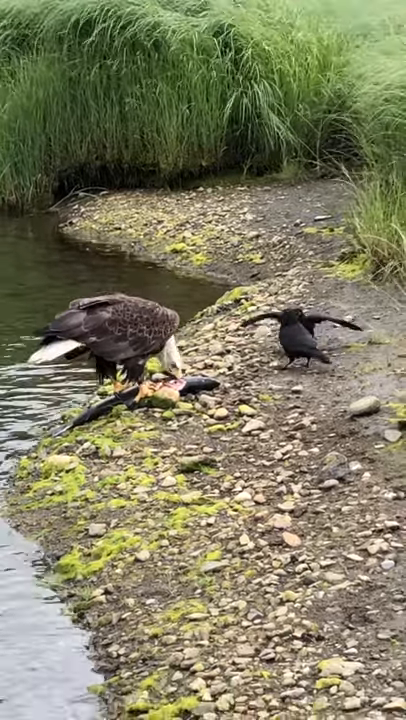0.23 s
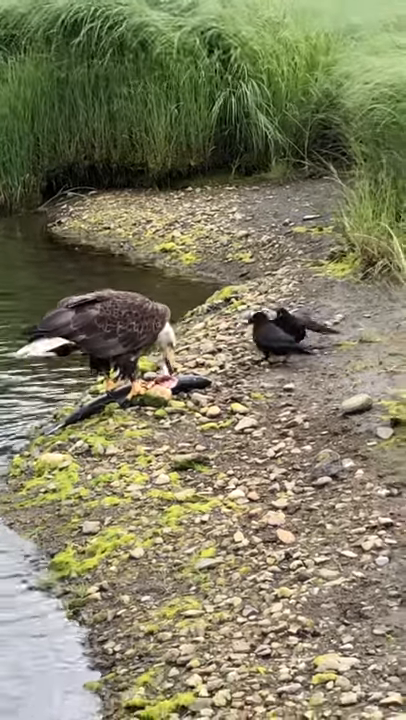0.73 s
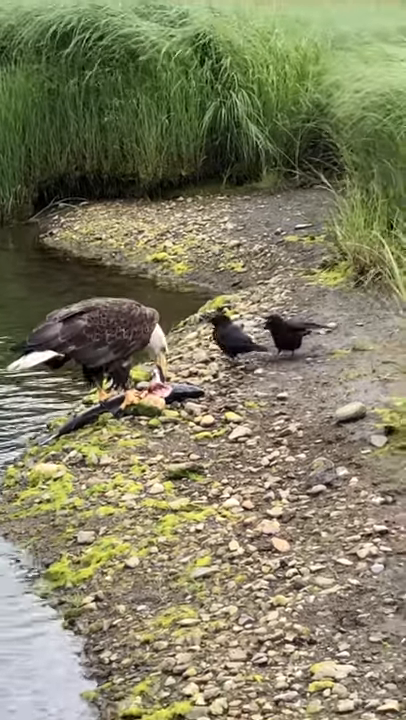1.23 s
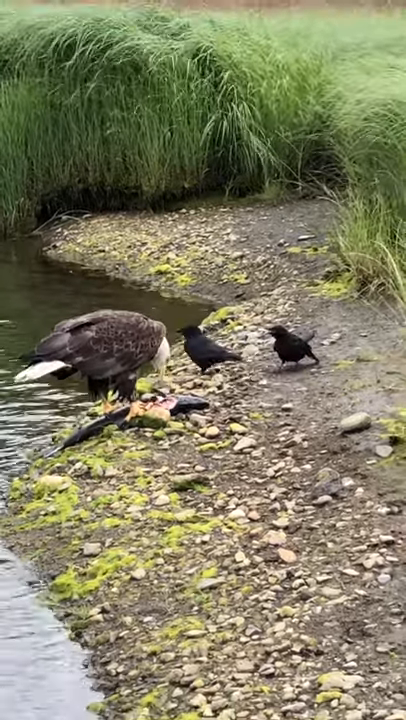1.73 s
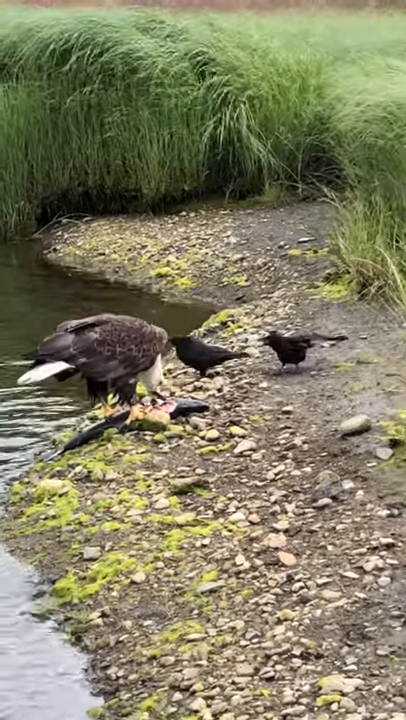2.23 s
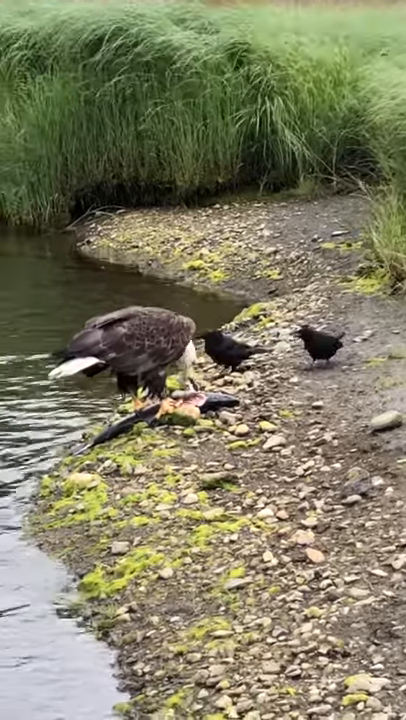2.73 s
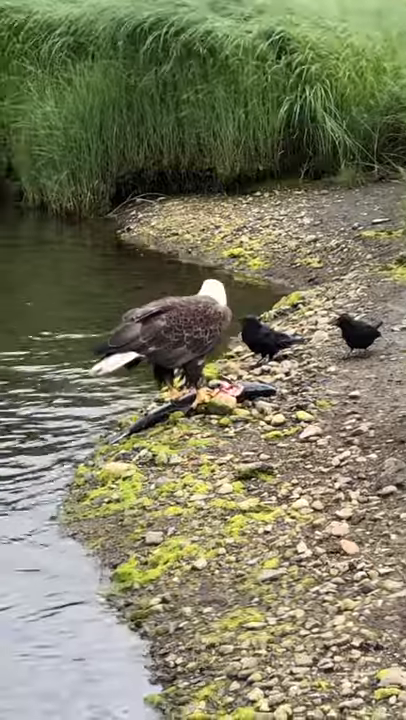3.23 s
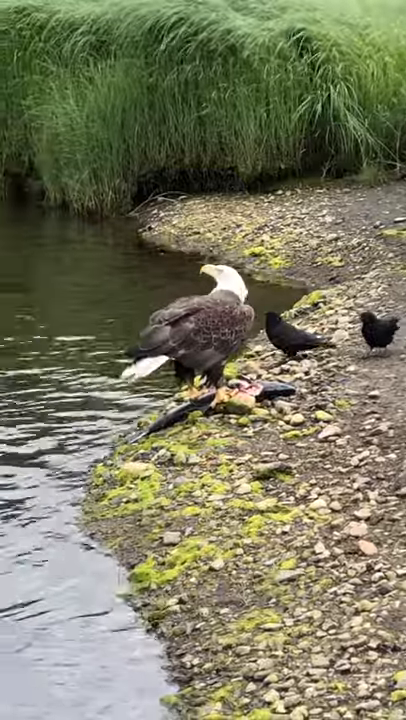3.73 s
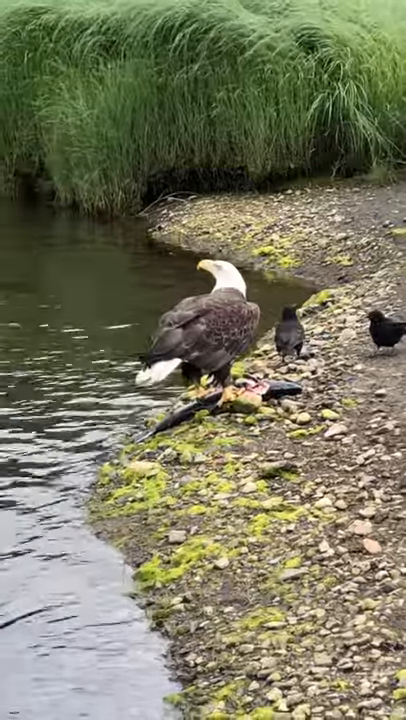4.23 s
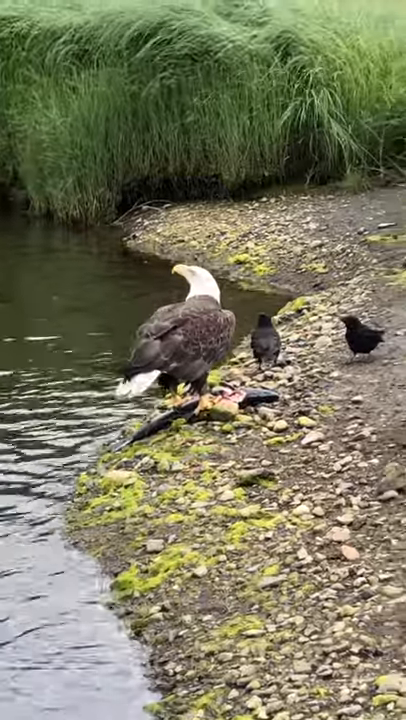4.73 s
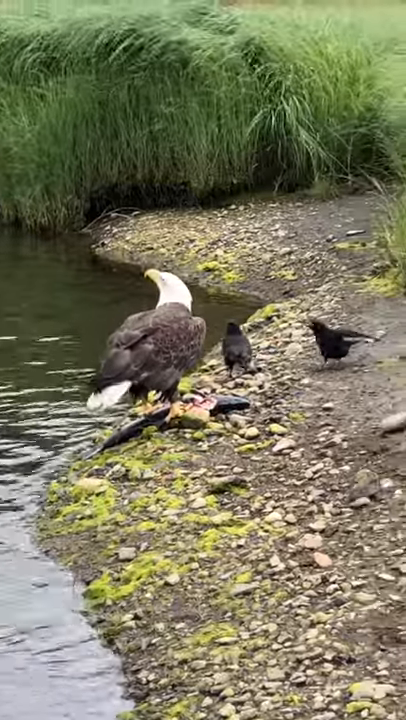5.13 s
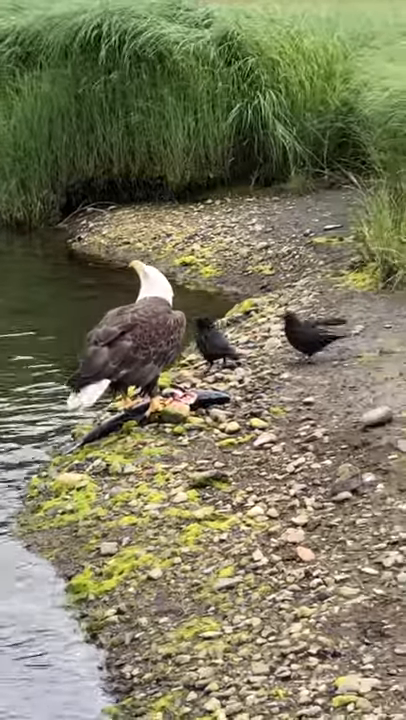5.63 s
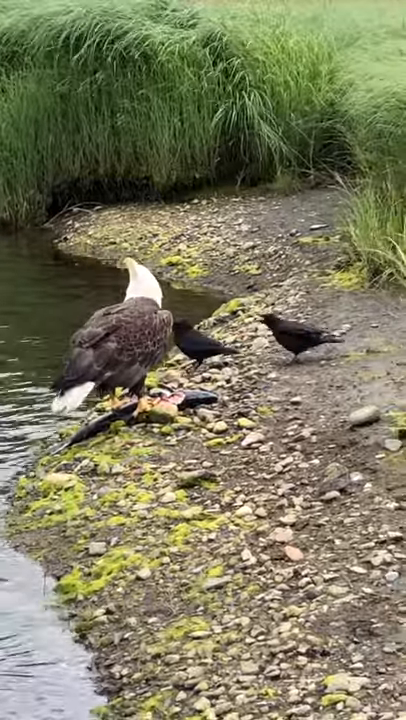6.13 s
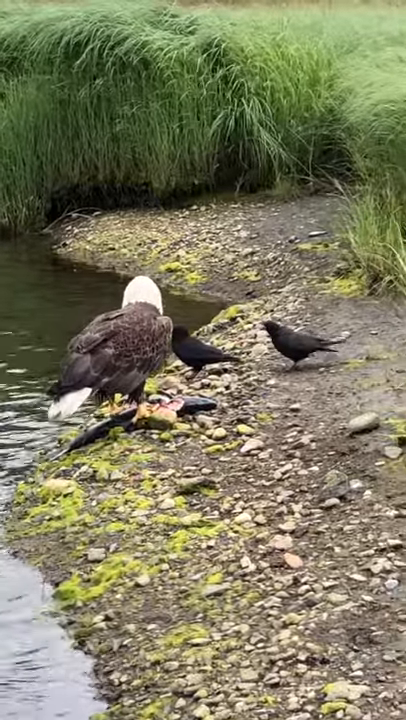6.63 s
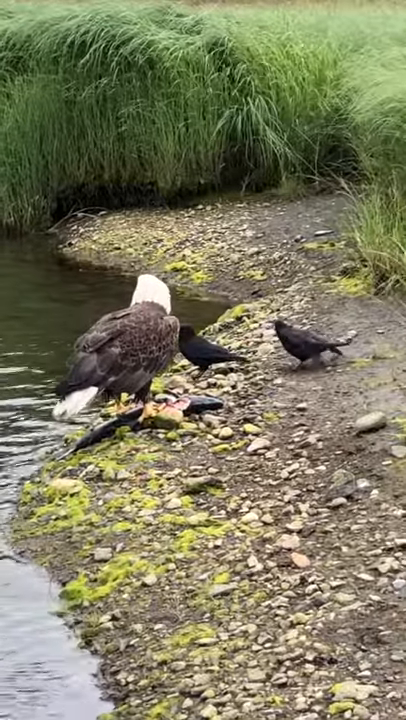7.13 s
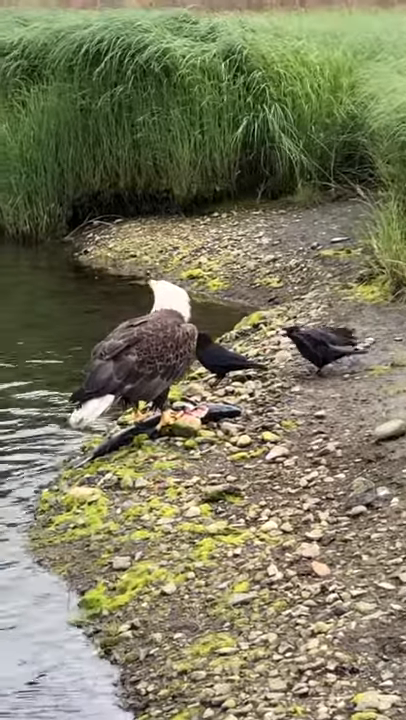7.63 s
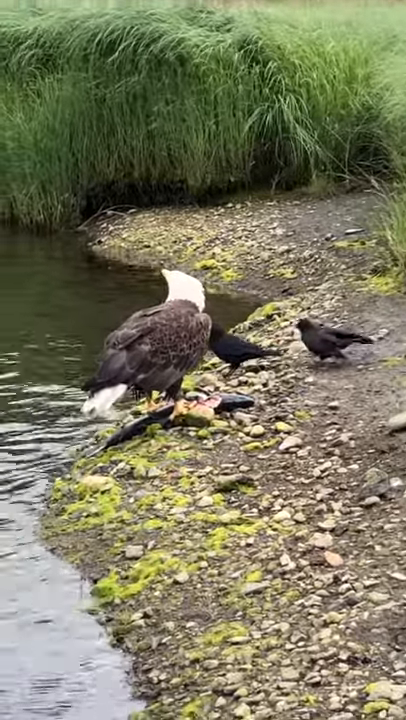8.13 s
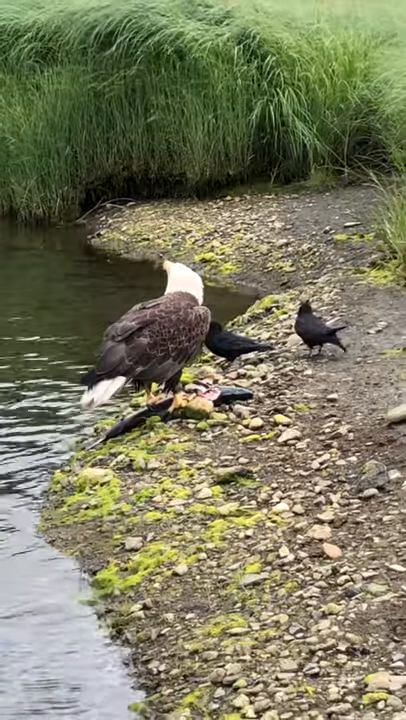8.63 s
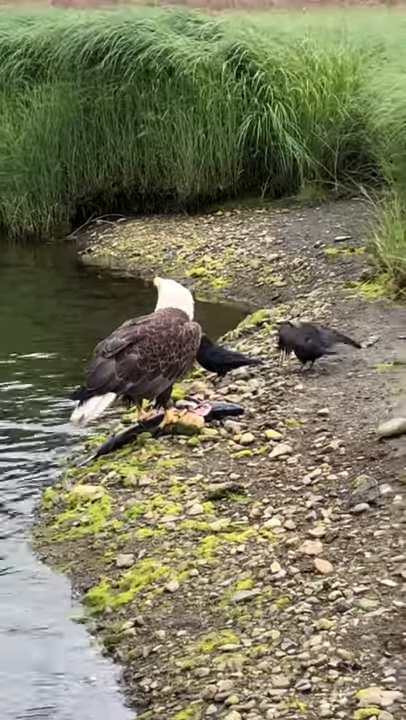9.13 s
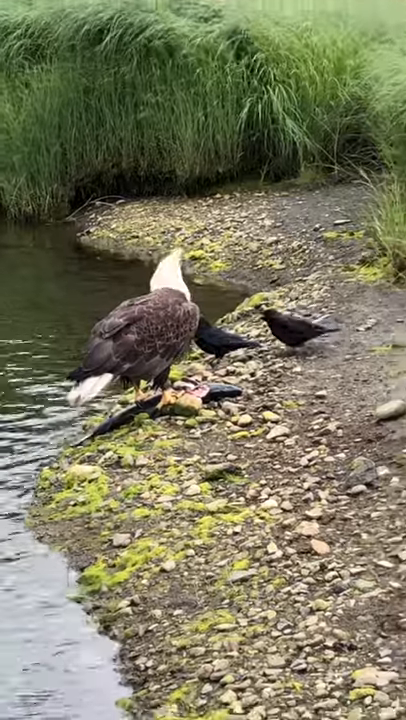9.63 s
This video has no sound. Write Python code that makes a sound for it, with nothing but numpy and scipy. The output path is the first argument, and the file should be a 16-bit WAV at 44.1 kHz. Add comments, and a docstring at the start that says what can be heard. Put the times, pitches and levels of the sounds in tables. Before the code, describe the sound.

Outdoors on a gravel creek bank, a crow's hoarse caw is already fading as it opens, then more short rasping caws follow about every second. Thin, near-pure peeps from another bird dot the gaps. Behind lies a soft low rush and a faint far engine tone creeping upward. Wind knocks the microphone in single thumps, swelling to a loud low rumble in the last second or so.

```python
"""The hoarse tail of a caw comes first: crows beg on a gravel creek bank, beside an eagle at its fish.
Pulses through a throat filter make their long caws, with feathery rustles of noise late on.
Another bird peeps thinly in near-pure tones; a far engine tone slowly rises over a soft noise rush.
Wind buffets the microphone as bands of noise, in single thumps at first and a loud rumble at the end."""
import sys
import numpy as np
from scipy import signal
from scipy.fft import rfft, irfft, next_fast_len
from scipy.io import wavfile
from scipy.ndimage import uniform_filter1d, map_coordinates

SR = 44100
rng = np.random.default_rng(int(sys.argv[2]) if len(sys.argv) > 2 else 0)


def store_pcm(level_fs):
    """Save levels as 16-bit WAV."""
    pcm = np.round(np.clip(level_fs, -1, 1) * 32767).astype(np.int16)
    wavfile.write(sys.argv[1], SR, np.atleast_2d(pcm).T)


N = 435708
TIME = np.arange(N) / SR
CUTOFF_HZ = 15900  # top of the microphone's range

# Distant rush, loudness over time: (time [s], level [dB])
RUSH_LEVEL = [(0, -39), (2.6, -38.5), (3.6, -36.5), (5, -37.5), (6, -35), (6.8, -35.5), (7.3, -37.5),
              (8.2, -37.5), (9.88, -39.5)]
# Distant rush, tone colour: (frequency [Hz], relative power density [dB])
RUSH_COLOUR = [(30, -26), (70, 12.5), (170, 2), (380, -12.5), (520, -9), (700, -2), (900, -0.5), (1150, -8),
               (1500, -14.5), (2200, -23.5), (3500, -31.5), (5500, -38.5), (9000, -48), (15000, -51)]
# Far engine: (time [s], pitch [Hz], level [dB])
ENGINE_COURSE = [(0, 128, -52), (1.9, 129.5, -48), (3.2, 134.5, -39), (6.95, 142.3, -38), (7.5, 144.3, -42),
                 (9.88, 149, -36)]

# Wind gusts that swell and die away: (time [s], half width [s], level [dB])
WIND_GUSTS = [(.03, 0.39, -48.5), (.56, 0.17, -40), (1.35, 0.28, -45), (1.73, 0.068, -39), (2.64, .06, -37),
              (3.32, 0.077, -43), (4.3, 0.59, -49.5), (5.1, 0.13, -37), (5.39, 0.035, -32.5),
              (5.84, 0.22, -34.5), (6.55, 0.12, -32), (7.8, 0.55, -46.5), (8.5, .12, -31),
              (8.79, 0.15, -23.5), (9.05, 0.29, -33.5), (9.37, 0.09, -22), (9.57, 0.14, -22.5),
              (9.88, 0.049, -24.5)]
# Single wind thumps: (time [s], half width [s], level [dB])
WIND_BUFFETS = [(.73, 0.037, -31.5), (1.243, 0.016, -25.5), (1.713, 0.022, -27), (2.63, 0.024, -37),
                (4.708, 0.017, -21.5), (5.689, 0.0095, -20.5), (5.774, 0.0095, -27), (6.004, 0.0069, -23.5),
                (6.57, 0.024, -28.5), (8.425, 0.028, -24), (8.795, 0.023, -22), (8.85, 0.0095, -15.5),
                (9.35, .014, -23), (9.58, 0.016, -19.5), (9.619, 0.011, -14.5), (9.665, 0.0066, -19),
                (9.842, 0.0066, -19)]
# Eddies by size: (centre [Hz], level against the reference wind [dB], growth [dB per dB of wind])
WIND_EDDIES = [(62.6, -1, 0.58), (113, 4.5, 0.96), (194.3, 0.5, 1.26), (355, -6.5, 1.553),
               (644, -20.5, 1.65), (1120, -42, 1.91), (2100, -54, 0.3)]
BREEZE_DB = -66  # the air between gusts

# Soft feathery rustles: (time [s], length [s], level [dB])
FEATHER_RUSTLES = [(8.18, 0.24, -51), (8.675, 0.22, -52)]

# Thin whistled notes: (time [s], length [s], pitch [Hz], fundamental level [dB], octave level [dB])
PEEP_NOTES = [(0.882, 0.024, 2690, -60, -62), (1.845, 0.032, 2600, -52.5, -65),
              (1.903, 0.033, 2665, -45.5, -55.5), (2.626, 0.071, 2640, -57, -53.5),
              (2.706, 0.028, 2375, -64, -52.5), (2.836, 0.051, 2620, -51.5, -57),
              (2.937, 0.025, 2660, -56, -50.5), (3.056, 0.042, 2640, -56, -50),
              (3.118, 0.032, 2620, -51, -61), (3.187, 0.035, 2615, -49, -52),
              (3.325, 0.027, 2550, -46, -52), (3.739, 0.015, 2720, -47.5, -60),
              (4.042, 0.043, 2660, -52, -50), (4.125, 0.014, 2740, -69, -50),
              (4.254, 0.021, 2640, -56.5, -58), (4.368, .027, 2630, -53, -54),
              (4.484, 0.031, 2580, -54, -58.5), (4.6, .029, 2550, -50.5, -58), (4.713, .02, 2470, -51, -62),
              (4.825, .025, 3430, -52, -75), (5.919, .03, 2860, -51, -43.5), (6.005, 0.032, 2740, -62, -58),
              (6.435, 0.039, 2570, -50.5, -61), (6.592, 0.063, 2580, -49, -73),
              (6.639, 0.1, 2660, -51.5, -55), (7.231, 0.036, 2455, -44, -57), (7.283, 0.01, 2920, -42, -47),
              (7.305, 0.0074, 2810, -41, -44), (7.354, 0.028, 2415, -46.5, -59),
              (7.383, 0.034, 2760, -43, -43.5), (7.479, 0.039, 2700, -45, -43.5),
              (8.165, 0.035, 2750, -44, -61), (8.539, 0.046, 2750, -47, -58), (8.639, .039, 2680, -45, -56),
              (8.745, 0.033, 2550, -48, -58), (9.511, 0.018, 2810, -45.5, -66),
              (9.621, 0.056, 2710, -48, -59)]
# Notes above this pitch rise, notes below it fall, by this share of the distance
PEEP_LEVEL_HZ, PEEP_GLIDE = 2583, .7
# Further peeps at random times; length is the average, spread a share of the pitch
RANDOM_PEEP_COUNT, RANDOM_PEEP_S, RANDOM_PEEP_HZ, RANDOM_PEEP_SPREAD = 12, 0.03, 2750, 0.039
RANDOM_PEEP_DB, RANDOM_PEEP_OCTAVE_DB = -51.5, -67.5

# Caws, each one gesture: (start [s], length [s], break after [s], rasp before the break [s],
#  rasp roughness [0-1], roughness after the break [0-1], opening pitch [Hz], pitch at the break [Hz],
#  pitch after it [Hz], sag [Hz per s], opening level [dB], level after the break [dB], treble [dB],
#  flips up an octave at the break [yes/no], beak resonance [Hz], resonance lift [dB])
CAW_GESTURES = [(-.2, 0.28, 0.16, .03, .7, 0.23, 440, 440, 437.5, 129, -32, -32.5, -4, False, 2030, 7.2),
                (0.342, 0.33, 0.19, 0.027, 0.32, 0.25, 450, 433, 400, 129, -32, -35, -6.5, False, 1730, 1.8),
                (1.182, 0.32, .13, 0.016, 0.57, 0.28, 459, 429.6, 403.5, 425, -33, -36.5, -4.5, False, 4400, 0.5),
                (2.142, 0.33, 0.025, .027, 0.21, 0.024, 420, 405, 399.2, 148.5, -36.5, -36, -4, True, 2200, 5),
                (3.379, 0.31, 0.11, .04, 0.58, 0.15, 362, 440, 379, 200, -35, -36.5, -3.5, False, 2050, 4),
                (5.107, 0.34, .115, .02, 0.66, .06, 366.5, 441, 398.6, 145, -36, -36, -8, True, 3250, 5.6),
                (6.071, 0.36, 0.15, 0.08, 0.93, 0.14, 385.4, 411, 389.5, 70.4, -36, -37, -10.5, False, 3950, 1.5),
                (6.853, 0.36, 0.19, .13, 0.62, .06, 368, 429, 413.7, 134, -34, -35.5, -15, False, 1750, 2),
                (7.532, 0.33, 0.18, 0.098, 0.53, 0.11, 512, 433, 424.5, 350, -33.5, -34.5, -13, False, 1920, 2.3),
                (8.252, 0.24, 0.12, 0.087, 0.72, 0.21, 430, 439.5, 424, 403, -36, -38, -14, False, 3180, 5.7),
                (9.1, .38, 0.17, 0.071, .55, .1, 418.7, 434.7, 422.4, 108.5, -35, -33.5, -8.5, False, 2800, 7.5),
                (9.764, 0.39, 0.089, 0.0044, 0.53, 0.23, 476, 441, 430, 130, -32.5, -35, -7, False, 1920, 7.3)]
# The crow's throat and open beak as a filter: (frequency [Hz], gain [dB])
CROW_THROAT = [(400, -45.5), (800, -13.5), (1280, -0.5), (1730, 6.5), (2150, 0.5), (2650, -9), (3000, -7),
               (3450, -10.5), (4250, -8), (4950, -12), (6100, -10), (7700, -11), (11000, -23),
               (15500, -40.5)]
# A caw swells in from this level offset while its pitch settles (S values are time constants)
ONSET_S, ONSET_DB, SETTLE_S = 0.017, -11, .05
# It dies away on a pitch that falls by this share; a last tail follows the stated length
RELEASE_S, RELEASE_DB, RELEASE_FALL, TAIL_S = .028, -14, 0.28, .035
CLEAR_ROUGH, ONSET_ROUGH, COLLAPSE_ROUGH = .08, .85, .7  # roughness; the last two add on top
# Odd harmonics after an octave flip: 1.5 times this cut, easing to half of it in the collapse
FLIP_DB = -13
FLIP_TOP_DB = -10  # a flipping caw has less at the very top
EDGE_TREBLE_DB = 0.5  # treble lift weighted by the onset and release curves
SWITCH_S = .002  # time constant of a change of register
COLLAPSE_S = .04  # length of the final collapse
STUMBLES_PER_S, STUMBLE_SHARE = 22, .012  # small pitch jumps after the break
TREBLE_ARCH_DB = 3.5  # the beak is widest, and the voice brightest, in mid-caw


def from_db(db):
    """Decibels to gain."""
    return 10 ** (np.asarray(db) / 20)


def rms_one(x):
    """Scale to unit power."""
    return x / np.sqrt(np.mean(x ** 2) + 1e-20)


def steady(x, size):
    """Even out the power to about one over a sliding window of samples."""
    power = uniform_filter1d(uniform_filter1d(x * x, size), size)
    return x / np.sqrt(np.maximum(power, 1e-14))


def follow(rows):
    """The columns of a curve at every sample."""
    s, *columns = np.transpose(rows)
    return [np.interp(TIME, s, c) for c in columns]


def band(x, low_hz, high_hz, order=2):
    """Butterworth band-pass."""
    edges = [low_hz, min(high_hz, SR * .48)]
    return signal.sosfilt(signal.butter(order, edges, "band", fs=SR, output="sos"), x)


def drift(rate, size=N):
    """Smooth random curve through new values at the given rate per second; knot spread is 1."""
    knots = rng.standard_normal(size // 16 + 8)
    knots = knots[:int(size * rate / SR) + 6]
    return map_coordinates(knots, [np.arange(size) * rate / SR + 2], order=3, mode="nearest")


def colour(x, spectrum):
    """Causal (minimum-phase) filter with the given (Hz, dB) outline."""
    size = 2 * next_fast_len(len(x) // 2 + 2048)
    hz, db = np.transpose(spectrum)
    shape = np.interp(np.log(np.fft.rfftfreq(size, 1 / SR) + 1), np.log(hz), db)
    # folding the cepstrum forward in time gives minimum phase
    cepstrum = irfft(np.log(from_db(shape)))
    cepstrum[1:size // 2] *= 2
    cepstrum[size // 2 + 1:] = 0
    return irfft(rfft(x, size) * np.exp(rfft(cepstrum)))[:len(x)]


def step(t):
    """A quick smooth change from 0 to 1 at time zero."""
    return (1 + np.tanh(t / SWITCH_S)) / 2


def swells(rows):
    """Summed power of bell-shaped swells."""
    return sum(from_db(db) ** 2 * np.exp(-((TIME - s) / width) ** 2) for s, width, db in rows)


def rush(waver_db=0.97):
    """Smooth far-off noise, strongest in the bass with a second broad hump in the midrange."""
    noise = rms_one(colour(rng.standard_normal(N), RUSH_COLOUR))
    level_db = follow(RUSH_LEVEL)[0] + waver_db * drift(14)
    return from_db(level_db) * noise


def engine(waver_db=2.0, octave_db=-20):
    """One low firing tone with a weak octave; it climbs as it fades in and out over the distance."""
    hz, db = follow(ENGINE_COURSE)
    phase = 2 * np.pi * np.cumsum(hz * (1 + 0.0061 * drift(13))) / SR
    tone = np.sin(phase) + from_db(octave_db) * np.sin(2 * phase)
    return np.sqrt(2) * from_db(db + waver_db * drift(7.0)) * tone


def wind(reference_db=-30, lumps_db=2.5, fine_lumps_db=7.0):
    """Eddies on the microphone port: the harder it blows, the more small, bright ones join in."""
    gusts = from_db(BREEZE_DB) ** 2 + swells(WIND_GUSTS)
    power = gusts * from_db(lumps_db * drift(45)) ** 2 + swells(WIND_BUFFETS)
    strength_db = 10 * np.log10(power) - reference_db
    bursts, out = drift(220), 0
    for hz, db, growth in WIND_EDDIES:
        eddy = steady(band(rng.standard_normal(N), hz / 1.492, hz * 1.442, order=3), size=1400)
        felt_db = np.interp(TIME - 0.32 / hz, TIME, strength_db)  # large eddies build up later
        burst_db = fine_lumps_db * min(hz / 700, 1) * bursts
        out = out + eddy * from_db(reference_db + db + growth * felt_db + burst_db)
    return out


def bank(x, t60, scatter_db, far_db, far_t60=0.99):
    """Gravel and the grass bank scatter a short tail; the meadow returns a faint, duller one."""
    t = TIME[:SR]
    near = band(rng.standard_normal(SR), 750, 5000) * from_db(-60 * t / t60) * (t > .004)
    far = band(rng.standard_normal(SR), 500, 4500) * from_db(-60 * t / far_t60) * (t > .03)
    echo = (from_db(scatter_db) * rms_one(near) + from_db(far_db) * rms_one(far)) / np.sqrt(SR)
    return x + signal.fftconvolve(x, echo)[:N]


def rustles(flicker_db=3.0):
    """Short swells of dry, flickering noise."""
    swell = sum(from_db(db) * np.exp(-(2 * (TIME - s) / length) ** 2)
                for s, length, db in FEATHER_RUSTLES)
    noise = colour(rng.standard_normal(N), [(700, -38), (1700, 8.5), (2600, -4.5), (3600, 0),
                                            (5000, -15), (7000, -12.5), (12000, -36.0)])
    return swell * rms_one(noise) * from_db(flicker_db * drift(110))


def random_peeps():
    """Rows for the notes that fall at random times."""
    return [(when * N / SR, RANDOM_PEEP_S * (.5 + long),
             RANDOM_PEEP_HZ * (1 + RANDOM_PEEP_SPREAD * (2 * high - 1)),
             RANDOM_PEEP_DB, RANDOM_PEEP_OCTAVE_DB)
            for when, long, high in rng.random((RANDOM_PEEP_COUNT, 3))]


def peeps(arch=0.026, waver=0.012, flick=0.12, third_db=-15, edge_s=0.0056):
    """Whistled arched notes with an octave and a weaker twelfth; each starts with an upward flick."""
    out = np.zeros(N)
    for start, length, hz, low_db, octave_db in PEEP_NOTES + random_peeps():
        on = (TIME > start - edge_s / 2) & (TIME < start + length + edge_s / 2)
        u = (TIME[on] - start) / length  # 0 to 1 through the note
        edge = np.clip(np.minimum(u, 1 - u) * length / edge_s + .5, 0, 1)
        swell = np.sin(np.pi / 2 * edge) ** 2
        bend = arch * (.4 - (2 * u - 1) ** 2) + waver * drift(200, len(u))
        bend = bend - flick * (1 - swell) * (u < .5)
        glide_hz = hz + PEEP_GLIDE * (hz - PEEP_LEVEL_HZ) * (u - .5)
        phase = 2 * np.pi * np.cumsum(glide_hz * (1 + bend)) / SR
        overtones = from_db(octave_db) * (np.sin(2 * phase) + from_db(third_db) * np.sin(3 * phase))
        note = from_db(low_db) * np.sin(phase) + overtones
        out[on] += swell * from_db(2 * drift(150, len(u))) * note
    return out


def caw(t, pitch, level_db, treble_db, rough, odd, beak_hz, beak_db, flips, top_db=-15, split_hz=4900):
    """Syrinx pulses through the throat; as the voice roughens they stumble, beat and turn to a rasp."""
    rough, size = np.clip(rough, 0, 1), len(t)
    jitter = .007 * drift(80, size) + (.002 + .02 * rough ** 1.5) * drift(700, size)
    phase = 2 * np.pi * np.cumsum(pitch * (1 + jitter)) / SR
    # each pulse is a short sweep rather than a click, and its harmonics waver one by one
    pulses = 0
    for k in range(1, 48):
        in_range = k * pitch * (1 + jitter) < CUTOFF_HZ
        strength = in_range * odd ** (k % 2) * from_db(2.6 * drift(28, size))
        pulses = pulses + strength * np.cos(k * phase - np.pi * k * k / 14)
    # in the hoarsest stretches the pulses group in threes
    pulses = rms_one(pulses) * (1 + 1.1 * rough ** 2 * np.cos(phase / 3))
    # air rasps through at each opening; its hiss smothers the highest harmonics
    air = rng.standard_normal(size) * (1 + np.cos(phase) / 2)
    hiss = np.diff(rng.standard_normal(size + 2), 2)
    noise = (.07 + .8 * rough ** 2) * air + .2 * hiss
    voice = colour(pulses + noise, CROW_THROAT)
    voice = voice + (from_db(beak_db) - 1) * band(voice, beak_hz / 1.1, beak_hz * 1.1, order=1)
    lower = steady(band(voice, 300, split_hz, order=4), size=350)
    upper = steady(band(voice, split_hz, SR, order=4), size=350)
    # a shriller voice also reaches further up
    top = steady(band(voice, 2 * split_hz, SR, order=4), size=350)
    top_gain = from_db(top_db + FLIP_TOP_DB * flips + treble_db)
    fade = np.clip(np.minimum(t - t[0], t[-1] - t) / .003, 0, 1)
    return fade * from_db(level_db) * (lower + from_db(treble_db) * (upper + top_gain * top))


def crows():
    """Every caw follows one gesture: onset, clear opening, rasp, break, sag, hoarse collapse."""
    out = np.zeros(N)
    for (start, length, break_s, rasp_s, rasp, hoarse, open_hz, strained_hz, broken_hz, sag,
         open_db, broken_db, bright_db, flips, beak_hz, beak_db) in CAW_GESTURES:
        on = (TIME >= start) & (TIME <= start + length + TAIL_S)
        t = TIME[on] - start
        onset, release = np.exp(-t / ONSET_S), np.exp((t - length) / RELEASE_S)
        broken, collapsed = step(t - break_s), step(t - length + COLLAPSE_S)
        rasping = step(t - break_s + rasp_s) - step(t - break_s - SWITCH_S)

        stumble = STUMBLE_SHARE * rng.standard_normal(size=64)[(t * STUMBLES_PER_S).astype(int)]
        before = strained_hz + (open_hz - strained_hz) * np.exp(-t / SETTLE_S)
        after = (broken_hz - sag * (t - break_s)) * (1 + stumble)
        pitch = np.where(t < break_s, before, after) * (1 - RELEASE_FALL * np.minimum(release, 1))

        level_db = open_db + (broken_db - open_db) * broken + ONSET_DB * onset + RELEASE_DB * release
        arch = np.sin(np.pi * t / length) - 2 / np.pi  # averages zero over the caw
        treble_db = bright_db + TREBLE_ARCH_DB * arch + EDGE_TREBLE_DB * (onset + release)

        catches = np.maximum(1 + drift(STUMBLES_PER_S, len(t)), 0)  # hoarseness comes and goes
        clear = CLEAR_ROUGH + hoarse * broken * catches
        rough = clear + (rasp - clear) * rasping + ONSET_ROUGH * onset + COLLAPSE_ROUGH * collapsed
        odd = from_db(FLIP_DB * flips * broken * (1.5 - collapsed))
        out[on] = caw(t, pitch, level_db, treble_db, rough, odd, beak_hz, beak_db, flips)
    return out


def scene():
    """Birds on the bank, the distance behind them, wind at the microphone."""
    distance = rush() + engine()
    far_bird = bank(peeps(), t60=.3, scatter_db=-19, far_db=-21)
    near_birds = bank(crows() + rustles(), t60=.12, scatter_db=-19, far_db=-33)
    return (distance + wind() + far_bird + near_birds)[None]


def record(dry, low_cut_hz=40):
    """The microphone drops the deepest bass, rounds its peaks and cuts the top."""
    thin = signal.sosfilt(signal.butter(3, low_cut_hz, "high", fs=SR, output="sos"), dry)
    rounded = np.tanh(thin)
    return signal.sosfilt(signal.ellip(10, .1, 80, CUTOFF_HZ, fs=SR, output="sos"), rounded)


dry = scene()
out = record(dry)
store_pcm(out)
```